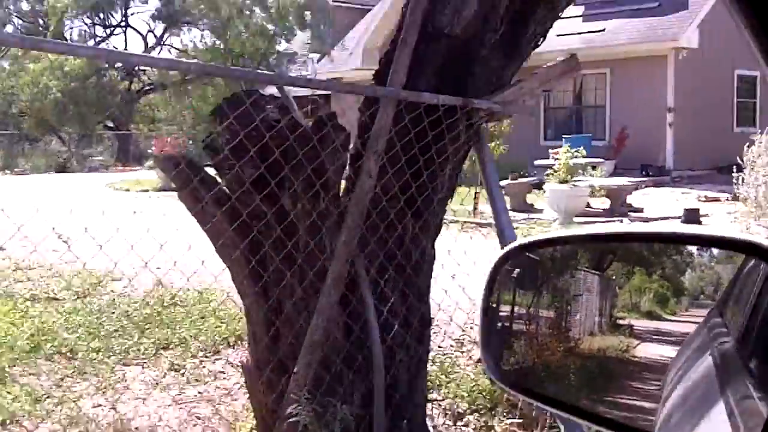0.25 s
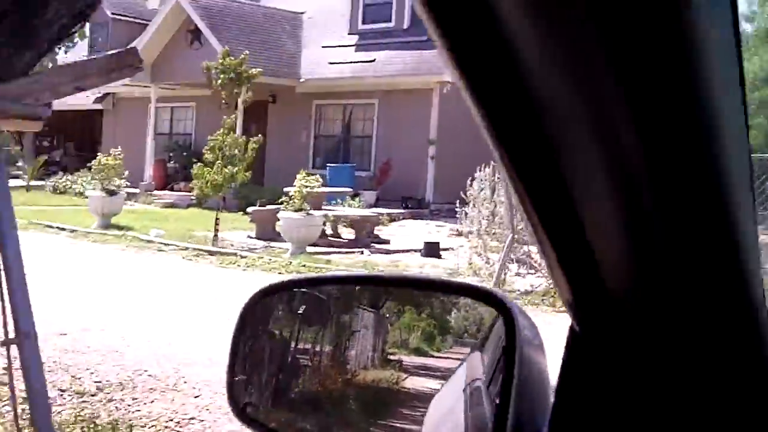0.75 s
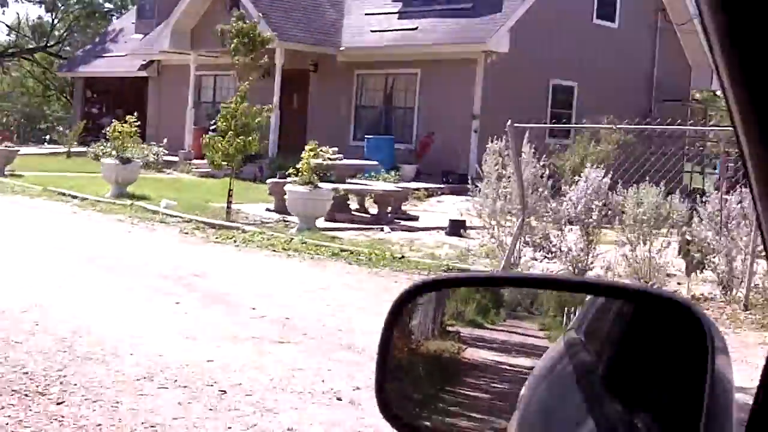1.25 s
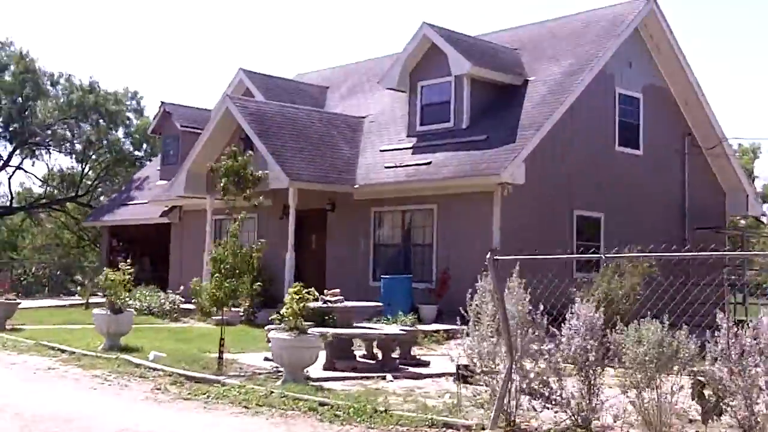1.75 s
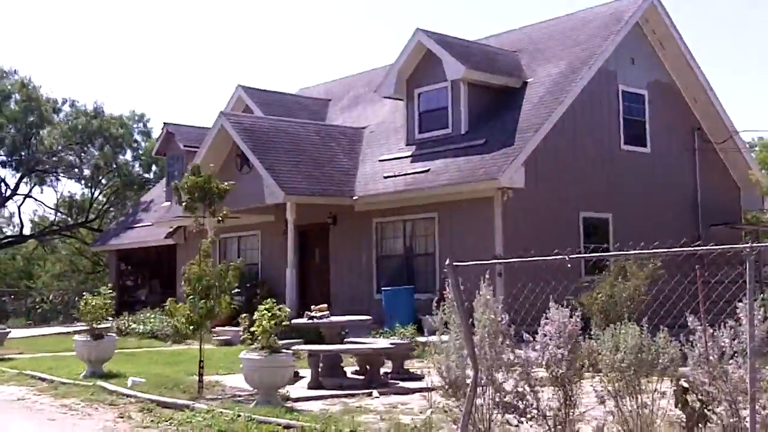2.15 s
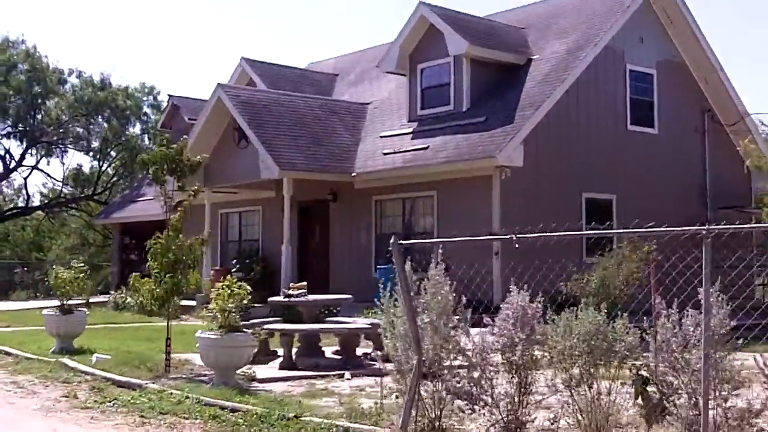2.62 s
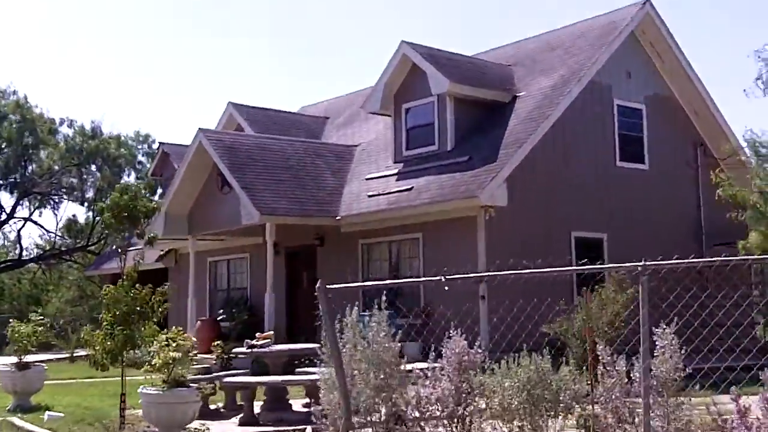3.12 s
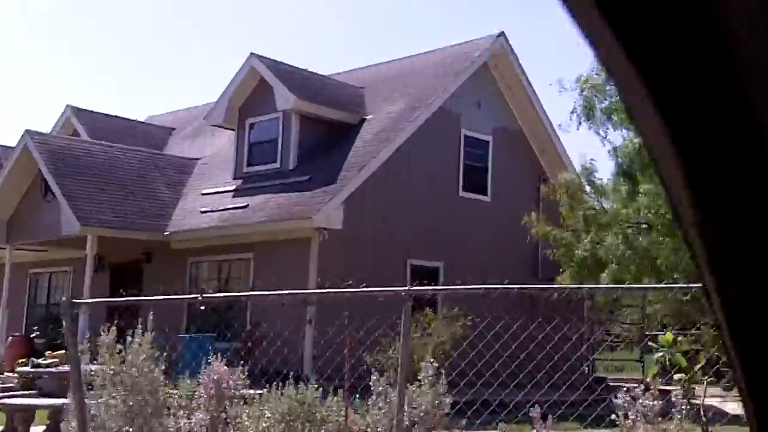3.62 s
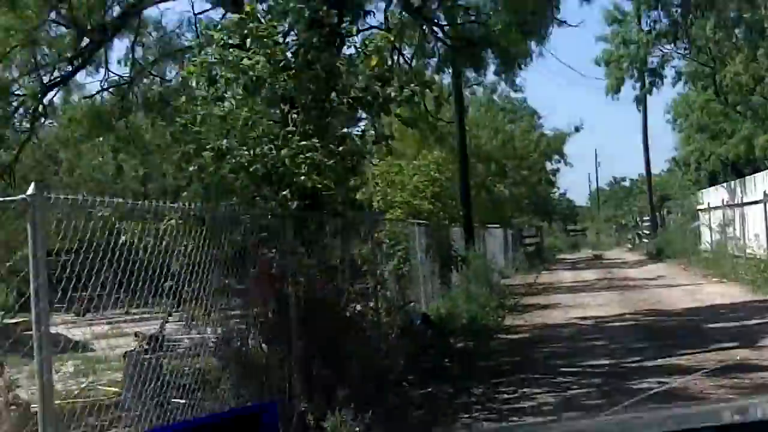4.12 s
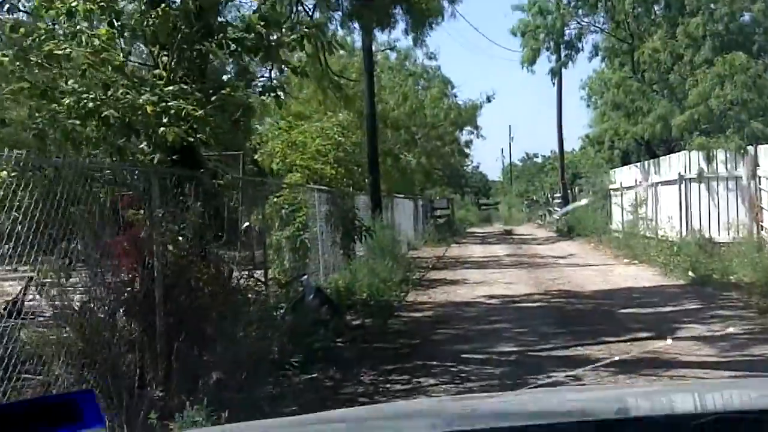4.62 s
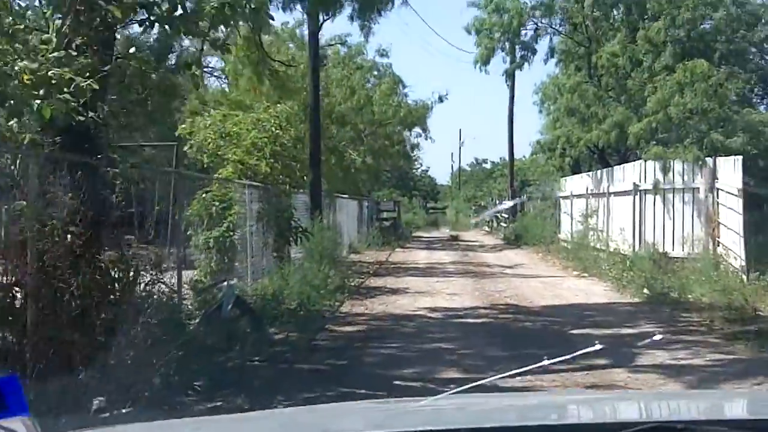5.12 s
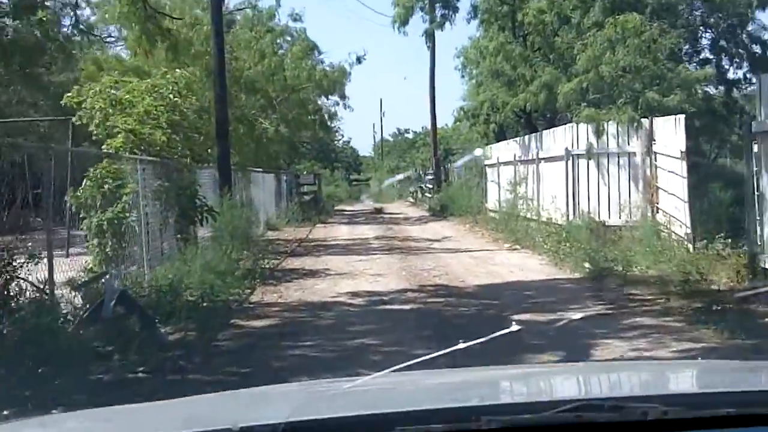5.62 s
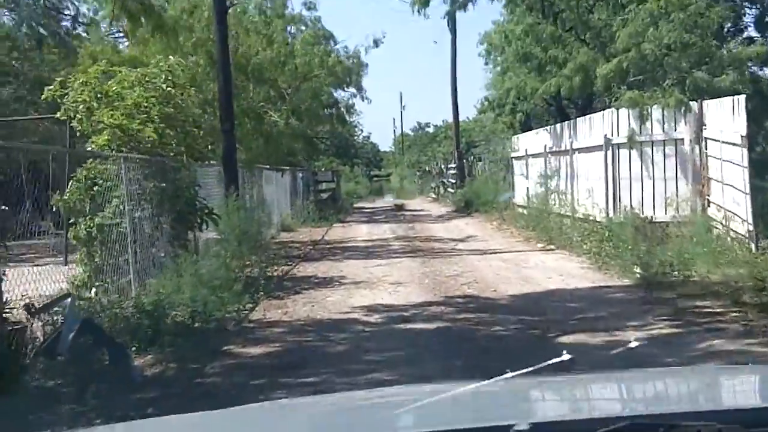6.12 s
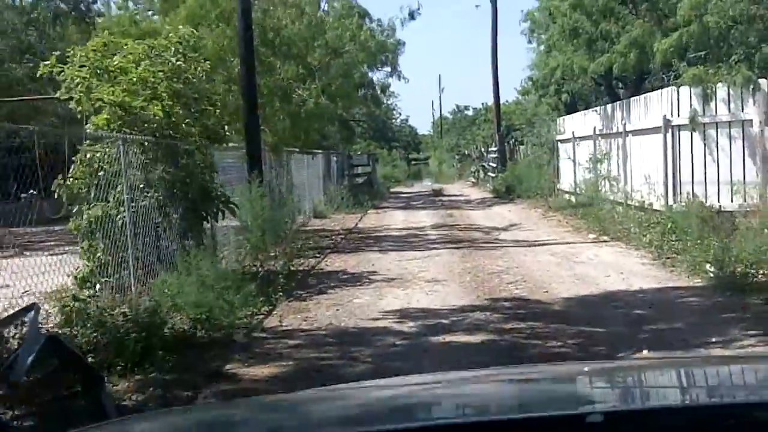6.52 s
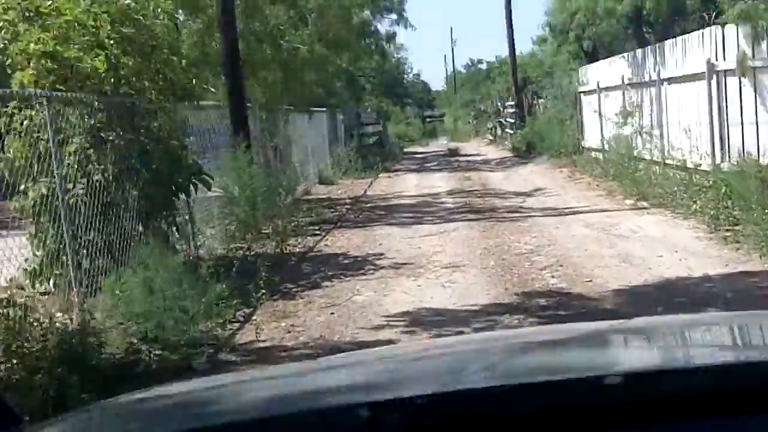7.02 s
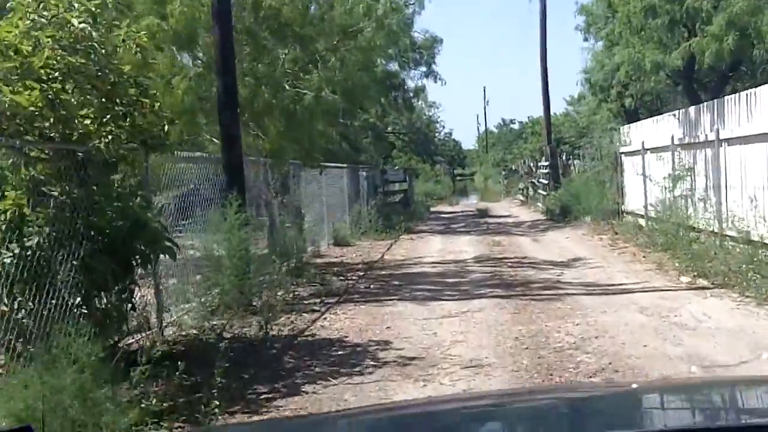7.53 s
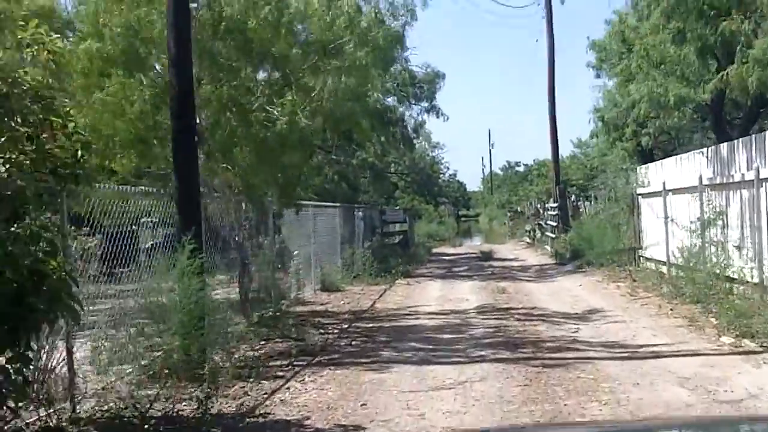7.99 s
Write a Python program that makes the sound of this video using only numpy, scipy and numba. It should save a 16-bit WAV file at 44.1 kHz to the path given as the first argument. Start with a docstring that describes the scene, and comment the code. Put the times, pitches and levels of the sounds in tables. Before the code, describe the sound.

A car creeps along a dirt road, heard from inside with a window open. The cabin booms and rumbles unevenly while the tyres crunch grit, stones pop and dry stalks snap. Wind thumps the microphone through the first half, as a thin, high cicada buzz swells and fades away. The tyre hiss then softens, a faint engine hum comes and goes, and the rumble and crunch carry on.

```python
"""A car rolls slowly over a dirt road, window open, heard through a small microphone held inside.
From the start the cabin booms, tyres crunch grit, stones pop and dry stalks crack. From 1 s gusts
thump the microphone and cicadas swell in the trees. Near 4 s the microphone turns from the window to
the windscreen: the dashboard rings more, the cicadas are gone by 4.6 s, then hiss and roar fall.
The engine hums from 5.5 to 7 s; boom and crunch run on to the end."""
import sys
import numpy as np
from scipy import signal
from scipy.fft import rfft, irfft, next_fast_len
from scipy.io import wavfile
from scipy.ndimage import uniform_filter1d
from numba import njit

SR = 44100
rng = np.random.default_rng(int(sys.argv[2]) if len(sys.argv) > 2 else 0)


def generate_wav(signal):
    """Clip the signal to [-1, 1] and save it as 16-bit WAV at the path in sys.argv[1]."""
    frames = np.transpose(np.atleast_2d(signal))
    scaled = np.clip(frames, -1, 1) * 32767
    pcm = np.round(scaled).astype(np.int16)
    wavfile.write(sys.argv[1], SR, pcm)


N = 364045

# cabin air: freq_hz, density_db
BOOM_SPECTRUM = [(4, -26), (8, -13), (15, -6), (23, 1.5), (31, -0.5), (47, -14), (60, -17), (85, -41.5)]
# boom, lurching with ruts and wind: time_s, level_db
BOOM_LEVEL = [(0, -4), (.08, -19), (.76, -17.5), (.87, -30), (1.03, -23), (1.26, -15.5), (1.35, -24.5),
              (1.6, -19), (2.4, -20.5), (2.55, -18), (3.5, -21), (3.61, -12), (3.7, -24), (3.81, -12),
              (3.98, -25.5), (4.08, -9.5), (4.16, -31), (4.41, -13.5), (4.78, -20), (5.12, -14.5),
              (5.4, -21), (5.56, -17.5), (5.86, -20), (6.6, -19.5), (6.76, -14.5), (6.88, -18.5),
              (7.02, -14), (7.09, -21.5), (7.4, -14.5), (7.61, -21), (7.91, -15), (8.12, -22.5),
              (8.25, -11)]
# car body: freq_hz, density_db
RUMBLE_SPECTRUM = [(30, -30), (45, -4.5), (60, -7.5), (70, -11.5), (85, -9), (105, -20.5), (130, -18.5),
                   (150, -27), (195, -20), (230, -30.5), (330, -43.5)]
# rumble between gusts: time_s, level_db
RUMBLE_LEVEL = [(0, -33), (.35, -30.5), (.55, -34), (1.1, -27), (1.35, -28.5), (1.7, -28), (2.7, -29.5),
                (3.5, -28), (4.3, -26), (4.6, -27), (5.0, -27), (5.3, -31.5), (5.6, -27), (5.95, -29.5),
                (6.67, -29.5), (7.05, -33), (7.25, -31.5), (7.5, -33.5), (7.8, -28), (8.1, -33),
                (8.25, -22)]
# gusts on the microphone: start_s, level_db, pitch_hz, t60_s, rumble_swell_db
GUSTS = [(1.196, -26, 140, .031, 1.5), (1.852, -18, 140, 0.02, -0.5), (1.935, -16, 150, 0.1, 6.5),
         (1.965, -7, 125, 0.045, 0.5), (2.015, -11, 95, .06, 6.5), (2.082, -15, 100, 0.07, 3),
         (2.11, -11, 110, 0.06, 7.5), (2.505, -11.5, 150, 0.05, 12), (3.402, -17, 140, 0.032, 2.5),
         (3.53, -11, 140, 0.03, 1), (3.615, -10, 140, 0.03, 12), (3.855, -8, 115, 0.08, 5.5),
         (4.035, -27, 190, 0.12, 0), (4.898, -24, 140, 0.041, 9), (5.45, -40, 140, .043, 9),
         (7.908, -38, 140, 0.027, 3.5)]
# tyre crunch: freq_hz, density_db
CRUNCH_SPECTRUM = [(200, -23.5), (330, -23.5), (430, -8.5), (550, -11.5), (1000, -18), (1300, -19),
                   (2000, -25.5), (3000, -27), (4200, -27.5), (5000, -24), (6100, -22.5), (7500, -35.5),
                   (9000, -47), (12000, -60.5), (15500, -66.5)]
# tyre crunch: time_s, level_db
CRUNCH_LEVEL = [(0, -45), (.1, -51), (.34, -48), (.51, -52), (.9, -47.5), (1.2, -42), (1.33, -49),
                (1.47, -42), (1.74, -44.5), (1.86, -39.5), (2.23, -41.5), (2.37, -40.5), (2.55, -44),
                (3.0, -44.5), (3.6, -45), (4.0, -45.5), (4.24, -46.5), (4.28, -44.5), (4.37, -40),
                (4.6, -46), (5.12, -45), (5.2, -51.5), (5.45, -44.5), (5.88, -47.5), (6.08, -52.5),
                (6.7, -49.5), (6.88, -52.5), (7.0, -52), (7.45, -52.5), (7.7, -51.5), (7.9, -47.5),
                (8.0, -53), (8.26, -46)]
# tyre hiss and roar, louder facing the window: time_s, hiss_db, roar_db
HISS_ROAR_LEVELS = [(0, -49, -47.5), (.6, -52, -46), (1.15, -47.5, -45), (2.2, -46.5, -41),
                    (3.0, -48.5, -39), (3.7, -50.5, -40.5), (4.2, -51.5, -44.5), (5.1, -50.5, -46),
                    (5.4, -53, -53), (6.4, -56, -52.5), (7.2, -58.5, -54.5), (8.26, -53, -57.5)]
# body panels: freq_hz, width_hz, gain_db
PANEL_MODES = [(830, 380, -6), (980, 300, 1.5), (1560, 720, -12.5), (1930, 500, -4.5), (2310, 160, -14)]
# dashboard: freq_hz, width_hz, gain_db
DASH_MODES = [(378, 35, 5), (1000, 96, -7.5), (1564, 140, -8.5), (2246, 18, -3)]
# dashboard ring as the microphone turns to it: time_s, gain_db
DASH_FACING = [(0, 2), (3.8, -3), (4.3, 5.5), (8.2, 6.5)]
# stones under the tyres: start_s, peak_db, pitch_hz, knock_over_rattle_db
STONES = [(0.355, -31.5, 1980, 6), (.357, -34, 1340, 12), (1.003, -34, 900, 15), (1.077, -30.5, 2200, 22),
          (1.086, -35, 2310, 23), (1.437, -28, 1000, 13), (1.484, -40, 800, 14), (1.574, -35, 985, 6),
          (1.612, -27.5, 2130, 14), (1.614, -30, 1400, 6), (1.86, -28, 1000, -5), (1.958, -27, 1210, 3),
          (2.106, -32, 1005, 9), (2.268, -35, 1130, 19), (2.333, -25, 876, -2), (2.356, -19, 860, 21),
          (2.369, -28, 835, 1), (2.482, -33, 910, 20), (2.584, -28.5, 1640, 11), (2.586, -25, 1000, 1),
          (3.991, -31, 695, 18), (4.13, -34.5, 1250, 4), (4.268, -24, 835, 22), (4.284, -34, 2300, 16),
          (4.326, -29, 900, 14), (4.379, -25, 900, 24), (4.895, -32, 880, 18), (6.21, -33, 1250, 10),
          (6.669, -26, 890, 3), (7.887, -38, 1200, 14), (7.917, -23.5, 970, 0), (8.058, -39, 1500, 22),
          (8.192, -35, 940, -13)]
# dry stalks and grit cracking: start_s, peak_db, tilt_db, decay_ms
CRACKS = [(0.353, -22.5, 5.5, 11), (1.072, -36, -12, 10), (1.0894, -33, -10, 6.5), (1.245, -32, -9, 8),
          (1.481, -32, -20, 12), (1.6076, -19.5, 6, 15), (1.845, -29, 1, 5.5), (2.016, -24, 1, 5.8),
          (2.027, -23, 0, 3), (2.063, -29, -3, 3), (2.1615, -28, 11, 2.7), (2.33, -24.5, 1, 13),
          (2.3552, -20, -8, 2.3), (2.364, -25, -14, 2.2), (2.385, -26, -2, 3.2), (2.519, -33, -5, 6),
          (2.563, -36, -1, 3), (2.585, -28, -6, 13), (2.696, -19, 0.5, 7.4), (2.77, -28.5, 1, 15),
          (3.02, -32, -7, 5.8), (3.753, -34, 3, 39), (4.012, -33, -12, 10), (4.104, -35, -5, 3),
          (4.269, -32.5, -10, 2.5), (4.456, -28, -1, 22), (4.8894, -44, 2, 7), (5.091, -33, 5, 8),
          (5.641, -34.5, -2, 6.7), (6.209, -30, -2, 22), (7.215, -22, 1, 6.5), (7.885, -36.5, 4, 7.4)]
# coarse grit, crushed in patches: time_s, level_db
GRIT_LEVEL = [(0, -60), (.5, -62), (.95, -60), (1.08, -53), (1.25, -50.5), (1.35, -57), (1.5, -67),
              (1.72, -65), (1.86, -64), (2.1, -52), (2.4, -59), (2.65, -48.5), (3.4, -58.5), (3.68, -58),
              (3.95, -57.5), (4.3, -62), (4.7, -62), (5.9, -63), (7.5, -69.5), (8.26, -64)]
# engine hum: pitch_hz, width_hz, level_db, start_s, end_s
ENGINE_LINES = [(61.2, 4.8, -32, 5.5, 7.0)]
# cicadas, loudest passing their tree: time_s, level_db
CICADA_LEVEL = [(0, -65.5), (.6, -70), (1.14, -64), (1.5, -62.5), (2.0, -57), (2.3, -60), (2.62, -58.5),
                (3.05, -57.5), (3.4, -59), (3.72, -62.5), (4.03, -67), (4.2, -76), (4.4, -70), (4.55, -66)]
# cicada tymbals: freq_hz, density_db
TYMBAL_SPECTRUM = [(4880, -58), (8300, -12), (9190, -4.5), (9730, -4.5), (10300, -7), (12200, -18),
                   (13300, -18), (14400, -20.5), (15000, -31)]
# slower of the two cicadas: time_s, power_share
SLOWER_CICADA = [(0.6, 0.54), (3.1, 0.4), (3.6, 0.5)]
# ridges where door and mirror echoes add up: start_s, end_s, from_hz, to_hz, level_db
ECHO_RIDGES = [(.8, 1.35, 9550, 9300, -6), (1.402, 2.303, 9460, 9770, -14),
               (1.802, 2.654, 10900, 10860, -19), (1.9, 2.545, 11400, 11400, -15),
               (2.194, 2.633, 9670, 10270, -4), (2.247, 2.655, 9540, 9500, -5), (2.6, 3.2, 9050, 8900, -9),
               (2.552, 3.093, 9830, 10400, -5.5), (2.6, 3.0, 10900, 11000, -12),
               (2.9, 4.098, 9430, 9500, -4.5), (2.7, 3.2, 11750, 11900, -15), (3.1, 3.85, 10050, 10100, -8),
               (3.2, 3.746, 10620, 10400, -13), (3.65, 4.1, 10800, 10600, -11), (4.05, 4.5, 9400, 9500, -6)]


def cabin():
    """Ruts and wind shake the cabin air (boom near 23 Hz) and the body; gusts swell the rumble."""
    t, (boom_db,), (rumble_db,) = np.arange(N) / SR, curves(BOOM_LEVEL), curves(RUMBLE_LEVEL)
    rise_s, fall_s = 0.057, 0.049
    for start_s, *_, swell_db in GUSTS:
        rumble_db += np.interp(t, [start_s - rise_s, start_s, start_s + fall_s], [0, swell_db, 0])
    boom = evened(colour(rng.standard_normal(N), BOOM_SPECTRUM), window_s=.12, depth=.5)
    shake = rng.standard_normal(N) * from_db(1.7 * drift(21) + 1.5 * drift(4))
    rumble = evened(colour(shake, RUMBLE_SPECTRUM), window_s=0.038, depth=0.25)
    upper = signal.sosfiltfilt(butter(110, "high"), rumble)
    _, roar_db = curves(HISS_ROAR_LEVELS)
    rumble += (from_db(0.16 * (roar_db - roar_db.mean())) - 1) * upper  # upper band follows the roar
    return from_db(boom_db + 1.9 * drift(5.5)) * boom + from_db(rumble_db) * rumble


def gusts():
    """An eddy pushes the microphone membrane: a few low, uneven swings."""
    out, t = np.zeros(N), np.arange(6000) / SR
    attack = np.sin(np.pi / 2 * np.minimum(t / 0.004, 1)) ** 2
    for start_s, level_db, pitch_hz, t60_s, _ in GUSTS:
        swing = np.sin(2 * np.pi * pitch_hz * (t + 0.0036 * (1 - np.exp(-t / 0.0025))))  # starts sharp
        rough = resonate(rng.standard_normal(len(t)), 1.42 * pitch_hz, 146)
        rough = unit_rms(resonate(rough, 1.42 * pitch_hz, 146))
        decay = from_db(level_db - 60 * t / t60_s)
        add(out, decay * (swing + 0.26 * rough) * attack, start_s - .003)
    return out


def tyres():
    """Clumped grains over a smooth roll ring panels, dashboard and door; hiss and roar follow."""
    grit = grains(per_s=1500, clump_db=6, clump_hz=14, spread_db=3.35, max_spreads=4)
    roll = rng.standard_normal(N) * from_db(1.38 * drift(25))
    crunch = unit_rms(panels(colour(roll + 0.68 * unit_rms(grit), CRUNCH_SPECTRUM)))
    facing_db, = curves(DASH_FACING)
    dash = from_db(facing_db) * ring(crunch, DASH_MODES)
    door = from_db(facing_db[0] - facing_db) * resonate(crunch, freq_hz=781, width_hz=36)
    crunch = crunch + dash + door
    hiss = signal.sosfiltfilt(butter(2900, "high"), crunch)
    roar = signal.sosfilt(butter([220, 335], "band"), rng.standard_normal(N))
    (crunch_db,), (hiss_db, roar_db) = curves(CRUNCH_LEVEL), curves(HISS_ROAR_LEVELS)
    swing_db = crunch_db - uniform_filter1d(crunch_db, int(0.83 * SR))
    return (from_db(crunch_db) * (crunch - hiss)
            + from_db(hiss_db + 0.95 * swing_db) * unit_rms(hiss)
            + from_db(roar_db + 0.82 * swing_db) * unit_rms(roar))


def stones():
    """Each stone knocks the wheel arch once, then rattles: a dull ring through the panels."""
    out = np.zeros(N)
    for start_s, peak_db, pitch_hz, knock_db in STONES:
        blow = fractures(decay_s=0.011, density=0.06, squareness=1.6)
        blow[20] += from_db(knock_db)
        pop = panels(resonate(resonate(blow, pitch_hz, 420), pitch_hz, 1000))
        add(out, from_db(peak_db) * pop / np.abs(pop).max(), start_s - .001)
    return out


def cracks():
    """Dry stalks and grit snap: wide-band bursts, each with its own tilt, through the panels."""
    out = np.zeros(N)
    for start_s, peak_db, tilt_db, decay_ms in CRACKS:
        spectrum = [(700, -43), (1800, -2 * tilt_db), (6000, 21),
                    (9000, tilt_db - 4.5), (11000, tilt_db - 19), (15000, tilt_db - 30)]
        crack = panels(colour(fractures(decay_ms / 1000, density=0.36, squareness=2.2), spectrum))
        add(out, from_db(peak_db) * crack / np.abs(crack).max(), start_s - .001)
    return out


def coarse_grit():
    """Sparse crushed grains, each ringing briefly at one of eight pitches."""
    grit = grains(per_s=700, clump_db=7, clump_hz=18, spread_db=3.2, max_spreads=5)
    pitches_hz, choice = np.geomspace(1200, 7000, 8), rng.integers(0, 8, N)
    rings = sum(resonate(grit * (choice == k), hz, hz / 8.7) for k, hz in enumerate(pitches_hz))
    return from_db(curves(GRIT_LEVEL)[0]) * unit_rms(rings)


def engine():
    """A low, wavering hum of narrow-band noise, faded in and out."""
    t, out, fade_s = np.arange(N) / SR, np.zeros(N), 0.032
    for pitch_hz, width_hz, level_db, start_s, end_s in ENGINE_LINES:
        hum = resonate(resonate(rng.standard_normal(N), pitch_hz, width_hz), pitch_hz, width_hz)
        fade = np.clip(np.minimum(t - start_s, end_s - t) / fade_s, 0, 1)
        out += from_db(level_db) * unit_rms(hum) * fade
    return out


def cicadas():
    """Two cicadas click their tymbals into a broad buzz; narrow ridges in it slide as the car moves."""
    clicks_per_s, ridge_width_hz, fade_s = (164.4, 152.6), 210, 0.084
    t, (level_db,), (share,) = np.arange(N) / SR, curves(CICADA_LEVEL), curves(SLOWER_CICADA)
    faster, slower = [np.exp(-(rate * t + .03 * drift(20)) % 1 / .75) for rate in clicks_per_s]
    throb = np.sqrt(1 - share) * faster + np.sqrt(share) * slower
    buzz = unit_rms(colour(rng.standard_normal(N) * throb, TYMBAL_SPECTRUM))
    swell, waver_hz = from_db(1.8 * drift(2.8)), 40 * drift(3.6)
    lowpass = butter(ridge_width_hz / 2, "low", order=4)
    for start_s, end_s, from_hz, to_hz, ridge_db in ECHO_RIDGES:
        span = slice(int(start_s * SR), int(end_s * SR))
        progress = (t[span] - start_s) / (end_s - start_s)
        noise_iq = signal.sosfilt(lowpass, rng.standard_normal((2, 2 * SR)))[:, :len(progress)]
        phase = 2 * np.pi * np.cumsum(from_hz + (to_hz - from_hz) * progress + waver_hz[span]) / SR
        ridge = unit_rms(throb[span] * (noise_iq[0] * np.cos(phase) + noise_iq[1] * np.sin(phase)))
        arch = np.sqrt(np.abs(np.sin(np.pi * progress)))
        buzz[span] += from_db(ridge_db) * swell[span] * arch * ridge
    fade_out = np.clip((CICADA_LEVEL[-1][0] - t) / fade_s, 0, 1)
    return from_db(level_db) * fade_out * buzz


def grains(per_s, clump_db, clump_hz, spread_db, max_spreads):
    """Impulses of random size and sign; a drifting rate clumps them."""
    sizes = from_db(spread_db * np.minimum(rng.exponential(1, N), max_spreads)) * rng.choice([-1, 1], N)
    return sizes * (rng.random(N) < per_s * from_db(clump_db * drift(clump_hz)) / SR)


def fractures(decay_s, density, squareness):
    """A burst of tiny fractures; the squarer, the more abrupt its end."""
    t = np.arange(3000) / SR
    spikes = rng.random(len(t)) < density
    envelope = np.exp(-(t / decay_s) ** squareness) * np.minimum(t / 0.0018, 1)
    return rng.standard_normal(len(t)) * (spikes + 0.22) * envelope


def panels(x):
    """Input plus the ring of the body panels."""
    return x + ring(x, PANEL_MODES)


def ring(x, modes):
    """Parallel resonances."""
    return sum(from_db(gain_db) * resonate(x, freq_hz, width_hz) for freq_hz, width_hz, gain_db in modes)


def resonate(x, freq_hz, width_hz):
    """Two-pole resonance, unity peak gain."""
    r = np.exp(-np.pi * width_hz / SR)
    poles = [1, -2 * r * np.cos(2 * np.pi * freq_hz / SR), r * r]
    return signal.lfilter([(1 - r * r) / 2, 0, (r * r - 1) / 2], poles, x + 1e-18)


def butter(edge_hz, kind, order=2):
    """Maximally flat filter sections."""
    return signal.butter(order, edge_hz, kind, fs=SR, output="sos")


def colour(x, spectrum):
    """Shapes a white signal to a spectrum, interpolated in log frequency."""
    freq_hz, density_db = np.transpose(spectrum)
    size = next_fast_len(len(x))
    bins_hz = np.maximum(np.arange(size // 2 + 1) * SR / size, 1)
    gain_db = np.interp(np.log(bins_hz), np.log(freq_hz), density_db, left=-90, right=-120)
    return irfft(rfft(x, size) * from_db(gain_db), size)[:len(x)]


def drift(rate_hz):
    """Slow random wander, rms 1: twice low-passed noise."""
    hop = 40
    r = np.exp(-2 * np.pi * rate_hz * hop / SR)
    slow = signal.lfilter([1], [1, -2 * r, r * r], rng.standard_normal(N // hop + 2002))[2000:]
    return np.interp(np.arange(N) / hop, np.arange(len(slow)), unit_rms(slow))


def evened(x, window_s, depth):
    """Divides out part of a noise's random swell; rms 1."""
    x, size = unit_rms(x), int(window_s * SR)
    power = uniform_filter1d(uniform_filter1d(x * x, size), size)
    return unit_rms(x / (power + 0.028) ** (depth / 2))


def curves(rows):
    """Table columns after time_s, one value per sample."""
    time_s, *columns = np.transpose(rows)
    return [np.interp(np.arange(N) / SR, time_s, column) for column in columns]


def from_db(db):
    return 10 ** (np.asarray(db) / 20)


def unit_rms(x):
    return x / np.sqrt(np.mean(x ** 2) + 1e-20)


def add(out, sound, start_s):
    at = int(start_s * SR)
    out[at:at + len(sound)] += sound[:N - at]


@njit
def stepped_gain(level, ceiling, step, attack_s, release_s, hold_s):
    """Steps down while the held peak exceeds the ceiling, otherwise back up to 1."""
    fall = np.exp(-1 / (hold_s * SR))
    gain, held, waited, out = 1.0, 0.0, 0, np.empty(len(level))
    for i in range(len(level)):
        held = max(level[i] * gain, held * fall)
        waited += 1
        if held > ceiling and waited >= attack_s * SR:
            gain, waited = gain / step, 0
        elif held <= ceiling and waited >= release_s * SR:
            gain, waited = min(gain * step, 1.0), 0
        out[i] = gain
    return out


def scene():
    """Near-mono mix; the two channels differ only faintly, mostly in the treble."""
    mid = cabin() + engine() + gusts() + tyres() + coarse_grit() + stones() + cracks() + cicadas()
    late_treble = signal.sosfilt(butter(3500, "high"), np.roll(mid, 331))
    side = from_db(-39.5) * late_treble + from_db(-46.5) * np.roll(mid, 90)
    return np.array([mid + side, mid - side])


def record(dry):
    """Stepped gain control, comb with its first dip at 5.5 kHz, DC offset, steep top cut."""
    input_db, dc_offset, stopband_hz = 1.3, .0127, 15800
    loud = from_db(input_db) * dry
    gain = stepped_gain(np.abs(loud).max(axis=0), ceiling=.27, step=from_db(0.65),
                        attack_s=0.008, release_s=0.022, hold_s=0.013)
    comb = np.array([1, 0, 0, 0, .96])
    combed = signal.lfilter(comb / comb.sum(), 1, uniform_filter1d(gain, size=2) * loud)
    return signal.sosfilt(signal.cheby2(18, 60, stopband_hz, fs=SR, output="sos"), combed + dc_offset)


dry = scene()
out = record(dry)
generate_wav(out)
```